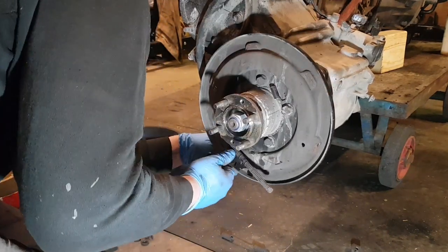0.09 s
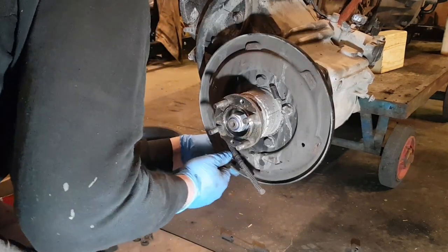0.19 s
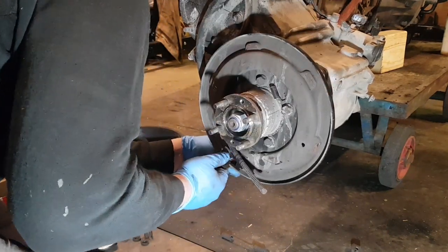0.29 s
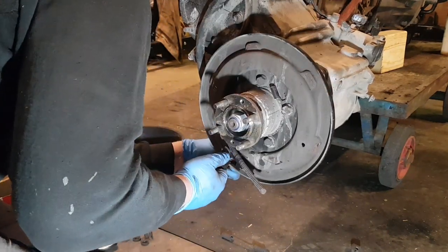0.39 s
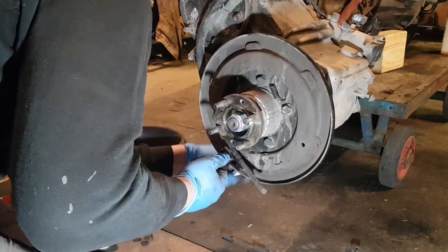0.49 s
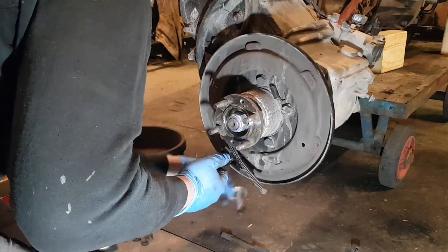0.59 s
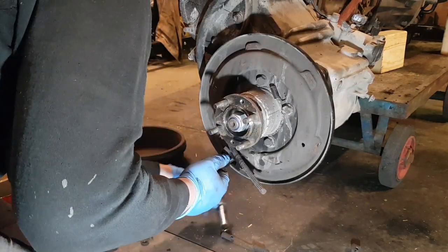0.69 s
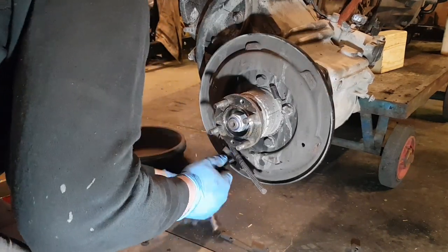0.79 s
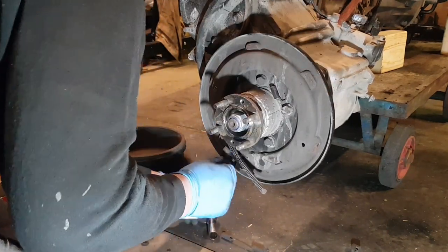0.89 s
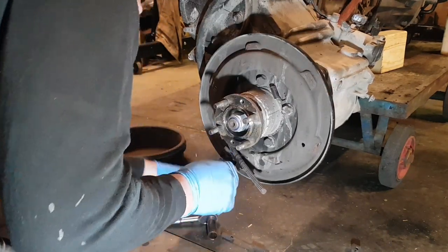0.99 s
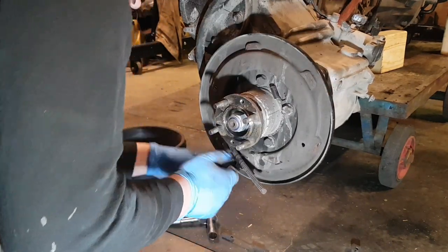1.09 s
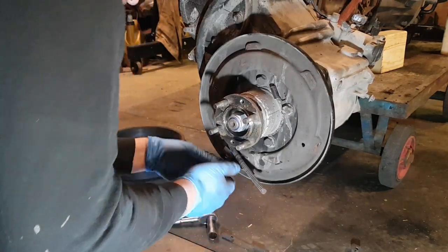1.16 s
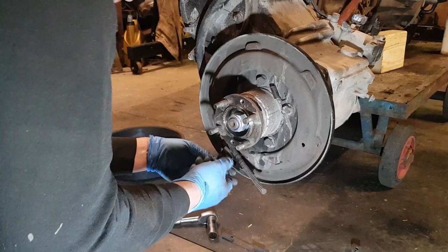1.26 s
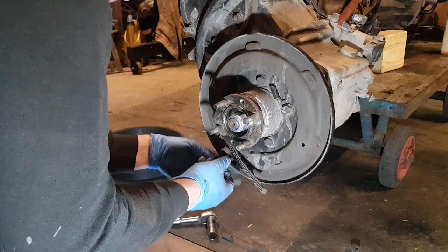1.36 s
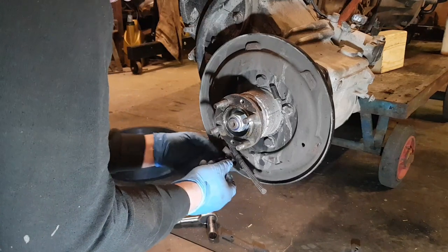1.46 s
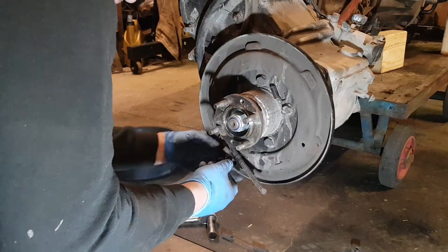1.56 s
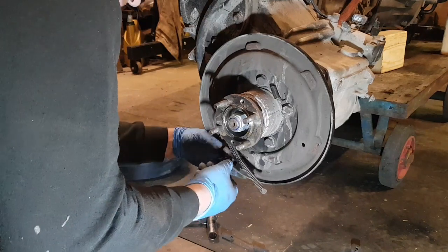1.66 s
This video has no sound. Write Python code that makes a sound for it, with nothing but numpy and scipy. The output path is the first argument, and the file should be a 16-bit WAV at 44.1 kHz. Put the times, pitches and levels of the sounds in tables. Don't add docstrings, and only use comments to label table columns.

```python
import sys
import numpy as np
from scipy import signal
from scipy.fft import rfft, irfft, next_fast_len
from scipy.io import wavfile

SR = 44100
rng = np.random.default_rng(int(sys.argv[2]) if len(sys.argv) > 2 else 0)


def volts_from_decibels(level):
    exponent = np.asarray(level, float) / 20
    return 10 ** exponent


def persist_wave(psi):
    counts = np.round(np.clip(psi, -1, 1) * 32767).astype(np.int16)
    wavfile.write(sys.argv[1], SR, np.atleast_2d(counts).T)


N = 74970

# pitch_hz, level_db, t60_s
PLATE_MODES = [(797, 5, 0.075), (778, -10.5, 0.16), (878, -14.5, 0.05), (936, -11.5, 0.05),
               (1010, -6.5, 0.056), (1079.5, -14, 0.11), (1175, -25, 0.052), (1480, -7.5, 0.09),
               (2470, -7.5, 0.064), (2616, -10, 0.064), (2880, -15, 0.015), (3256, -10, 0.023),
               (3440, -23, 0.07)]
PLATE_PAN_DB = -5


def rms_one(x):
    return x / np.sqrt(np.mean(x ** 2) + 1e-20)


def cut(x, hz, kind):
    return signal.sosfilt(signal.butter(2, min(hz, 20000), kind, fs=SR, output="sos"), x)


def pan(db):
    return volts_from_decibels(db * np.array([[.5], [-.5]]))


def at_hz(points, hz):
    points = np.array(points)
    return np.interp(np.log(hz), np.log(points[:, 0]), points[:, 1])


def in_time(rows):
    return np.interp(np.arange(N) / SR, *np.transpose(rows))


def drift(rate_hz):
    pole = np.exp(-80 * np.pi * rate_hz / SR)
    chance = rng.standard_normal(N // 40 + 2002)
    slow = signal.lfilter([1], [1, -2 * pole, pole * pole], chance)[2000:]
    return np.interp(np.arange(N) / 40, np.arange(len(slow)), rms_one(slow))


def dying(start_s, t60_s, rise_s):
    t = np.arange(N) / SR - start_s
    rise = np.clip(1 + t / rise_s, 0, 1) ** 2
    return np.where(t > 0, volts_from_decibels(-60 * np.abs(t) / t60_s), rise)


def blows(start_s, db, scatter_db):
    rattle_t60_s, rattle_db = 0.02, -29
    clicks = np.zeros(N)
    clicks[(np.array(start_s) * SR).astype(int)] = volts_from_decibels(db + scatter_db * rng.standard_normal(len(start_s)))
    after = signal.lfilter([0, 1], [1, -volts_from_decibels(-60 / (rattle_t60_s * SR))], clicks)
    return clicks + volts_from_decibels(rattle_db) * after * rng.standard_normal(N)


def body(modes, strikes, pan_db):
    spread_db, lag_s, skirt = 1.5, .00008, 1.45
    out = np.zeros((2, N))
    for (hz, db, t60_s), (lean, lag) in zip(modes, rng.standard_normal((len(modes), 2))):
        pole = volts_from_decibels(-60 / (max(t60_s, .003) * SR))
        feedback = [1, -2 * pole * np.cos(2 * np.pi * hz / SR), pole * pole]
        ring = volts_from_decibels(db) * signal.lfilter([.5, 0, -.5], feedback, strikes(hz) + 1e-18)
        ring = cut(cut(ring, hz * skirt, "low"), hz / skirt, "high")
        late = np.interp(np.arange(N) - abs(lag) * lag_s * SR, np.arange(N), ring)
        sides = np.array([ring, late] if lag > 0 else [late, ring])
        out += sides * pan(pan_db + spread_db * lean)
    return out


def banded(spectrum, shape, alike_plus):
    # pitch_hz, likeness (0 to 1)
    likeness = [(30, 1), (120, 0.94), (400, 0.59), (1000, 0.22), (4000, 0), (12000, 0.0)]
    low, high = spectrum[0][0], spectrum[-1][0]
    edges = np.geomspace(low, high, int(3 * np.log2(high / low)) + 2)
    white = rng.standard_normal((2, 2, N))
    out, power = 0, 0
    for k, (a, b) in enumerate(zip(edges, edges[1:])):
        band = signal.butter(2, [a, b], "band", fs=SR, output="sos")
        mid, side = signal.sosfilt(band, white[k % 2])
        hz = np.sqrt(a * b)
        alike = np.clip(at_hz(likeness, hz) + alike_plus, 0, 1)
        gain = volts_from_decibels(at_hz(spectrum, hz))
        power += gain ** 2 * np.mean(mid ** 2)
        stereo = np.sqrt(1 + alike) * mid + np.sqrt(1 - alike) * side * [[1], [-1]]
        out = out + gain * shape(hz) * stereo / np.sqrt(2)
    return out / np.sqrt(power)


def plate():
    # start_s, peak_db, brightness_db_per_octave
    knocks = [(0.021, -42, -34), (0.082, -37, -6.5), (0.146, -40.5, -9), (0.164, -39.5, -16),
              (0.177, -37.5, -7), (0.207, -35, 0), (0.212, -29.5, -12.5), (0.216, -30, -14.5),
              (0.221, -31, -6), (0.2275, -30, -18.5), (0.236, -37, -12), (0.261, -19.5, -4),
              (0.268, -25, -7.5), (0.272, -24, -1.5), (0.278, -17, 1), (0.2868, -10, -7.5),
              (0.303, -37, -3), (0.311, -29, -9), (0.324, -38, -12), (0.333, -41, -11), (0.364, -33.5, -20),
              (0.397, -39.5, -16), (0.417, -50.5, 3), (0.446, -49, -24), (1.272, -33.5, 8.5),
              (1.277, -41, 4.5), (1.306, -28.5, -3.5), (1.321, -26, -8.5), (1.375, -34.5, -22),
              (1.447, -41.5, -14), (1.453, -50.5, -11.5), (1.494, -56.5, 4)]
    # start_s,
    # pitch_hz, peak_db, t60_s
    bumps = [(0.21, 377.4, -46.5, 0.36), (.29, 356, -43, 0.11), (.29, 528, -43, 0.13),
             (0.288, 9500, -51, 0.028), (1.272, 446, -49.5, 0.24), (1.272, 6900, -49.5, 0.098),
             (1.276, 7180, -58, 0.05), (1.306, 432, -39.5, 0.11), (1.31, 3600, -64, 0.064),
             (1.376, 425, -45.5, 0.11), (1.503, 3700, -56.5, 0.065), (1.593, 1127, -68, 0.059),
             (0.977, 5440, -44, 0.043), (1.058, 4000, -54, .06), (1.098, 4030, -60, .05),
             (1.114, 4430, -51, 0.051), (.795, 5800, -60, .03)]
    # start_s, rms_db, t60_s
    sprays = [(0.259, -45, 0.11), (0.276, -37, 0.29), (0.444, -45.5, 0.36), (1.276, -44.5, 0.34),
              (1.308, -72, 0.35), (1.089, -57, 1), (1.495, -72, 0.25)]
    # pitch_hz, level_db (per Hz)
    spray_colour = [(500, -2), (1000, -4), (2000, 5), (2700, 8.5), (3600, 0), (5000, -6.5), (7000, -29),
                    (11000, -11.5)]

    start_s, peak_db, tilt_db = np.transpose(knocks)

    def strikes(hz):
        return blows(start_s, peak_db - 6.5 + tilt_db * np.log2(max(hz, 800) / 800), scatter_db=1.67)

    out = body(PLATE_MODES, strikes, PLATE_PAN_DB)
    for t, hz, level_db, t60_s in bumps:
        out += body([(hz, level_db, t60_s)], lambda _: blows([t], 0, 0), PLATE_PAN_DB)
    spray = sum(volts_from_decibels(level_db) * dying(t, t60_s, rise_s=0.0012) for t, level_db, t60_s in sprays)
    noise = banded(spray_colour, lambda hz: volts_from_decibels(1.3 * drift(50)), alike_plus=0.073)
    return out + spray * noise * pan(PLATE_PAN_DB)


def drag():
    # start_s, pressure_db, squeal_db
    pressure = np.array([(0, -63, -61.5), (0.077, -73, -69.5), (0.088, -52, -59.5), (0.202, -56.5, -49),
                         (0.221, -42, -45.5), (0.251, -58.5, -57.5), (0.284, -28.5, -42), (.33, -55.5, -74),
                         (.42, -68, -97.5), (.5, -91, -100.5)])
    # pitch_hz, level_db, t60_s
    jaw_modes = [(2850, -4, .015), (3270, -2, .015), (5850, -3, .015), (7060, -9, .02), (9660, -10, .02),
                 (14300, -2, .015)]
    slips_per_s, tilt_db, rasp_db = 2800, 0.5, -4.5

    sizes = volts_from_decibels(3.7 * np.minimum(rng.exponential(1, (3, N)), 5)) * rng.choice([-1, 1], (3, N))
    happens = rng.random((3, N)) < slips_per_s * volts_from_decibels(4 * drift(40)) / SR
    slips = rms_one(sizes * happens)
    shaken = body(PLATE_MODES, lambda hz: slips[0] * volts_from_decibels(tilt_db * np.log2(hz / 800)), PLATE_PAN_DB)
    rasp = slips[1:] + rng.standard_normal((2, N))
    rasp = cut(cut(rasp, 2545, "high"), 2545, "high")
    squeal = rms_one(body(jaw_modes, lambda hz: slips[0], PLATE_PAN_DB)) + volts_from_decibels(rasp_db) * rms_one(rasp)
    shaken_gain = volts_from_decibels(in_time(pressure[:, :2]) + 3)
    squeal_gain = volts_from_decibels(in_time(pressure[:, ::2]))
    return shaken_gain * rms_one(shaken) + squeal_gain * squeal


def spanner():
    # start_s, peak_db
    clicks = [
        (0.4436, -24.5),
    ]
    # pitch_hz, level_db, t60_s
    spanner_modes = [(1491, -11, 0.13), (1778, -12, 0.22), (2013, -22, .2), (2466, -6, 0.09),
                     (2520, -12, 0.25), (2645, -14, .12), (2810, -10, .1), (3042, -4, .06), (3079, 3, 0.15),
                     (3180, -2, 0.04), (3488, -6, 0.22), (3650, -6, 0.05), (4597, -10, 0.17),
                     (7070, -22, .15)]
    contact_hz = 4800
    start_s, peak_db = np.transpose(clicks)
    rings = body(spanner_modes, lambda hz: blows(start_s, peak_db - 5.5, scatter_db=1.5), pan_db=-3.5)
    return cut(rings, contact_hz, "low")


def dropped_part():
    # start_s, peak_db, ring_t60_s, jingle_db, crack_brightness_db_per_octave
    bounces = [
        (0.7678, -27.5, 1, -65.5, 5),
        (0.8603, -14, 0.36, -47.5, 2),
        (0.9767, -18.5, 0.28, -42, 2),
        (1.047, -30.5, 0.14, -58, 0),
    ]
    # pitch_hz, level_db (per Hz)
    colours = [
        [(200, -26), (330, -6.5), (1200, -2), (2200, -13), (3500, -28), (6200, -20.5), (7000, -72.5),
         (9000, -41.5)],
        [(150, -11.5), (330, -18), (640, 0.5), (930, 4), (1300, -7), (2000, -11.5), (4000, -31), (9000, -52)],
        [(130, -4.5), (250, -4), (640, 0.5), (1100, -1), (1550, -1.5), (2500, -9), (5500, -23), (9000, -27.5)],
    ]
    # start_s, level_db (against the bounce before)
    rocking = [(0.793, 5), (0.818, -22), (0.8636, 6), (.8705, 4.5), (0.883, -7), (0.905, -7), (0.982, -2.5),
               (0.995, -15), (1.008, -13.5), (1.058, 0)]
    # pitch_hz, level_db, t60_s
    part_modes = [(249.4, 3.5, 0.17), (396, -11, 0.078), (534, 1, 0.14), (628, -4, 0.19), (700, -7, 0.053),
                  (927, -6.5, 0.14), (1090, -4, 0.1), (1575, 0, 0.13)]
    # pitch_hz, level_db (per Hz)
    jingle_colour = [(5000, -3.5), (6700, -9), (7400, -1.5), (9300, -10.5), (12000, -1.5), (13500, -2),
                     (15700, -13.5)]
    part_db, part_pan_db = -14.5, -3.5
    slap_db, slap_t60_s, clatter_db = 3, 0.0088, 3
    treble_shortens = 0.027
    rock_t60_s, jingle_t60_s, jingle_lead_s = 0.019, 0.176, 0.026

    start_s, peak_db, ring_t60_s, jingle_db, crack_db = np.transpose(bounces)

    def strikes(hz):
        return blows(start_s, peak_db + part_db + at_hz(colours[1], hz), scatter_db=3.5)

    out = body(part_modes, strikes, pan_db=0)
    for k, next_s in enumerate([*start_s[1:], N / SR]):
        rocks = sum(volts_from_decibels(db) * dying(t, rock_t60_s, rise_s=0.00095)
                    for t, db in rocking if start_s[k] < t < next_s)
        slap = dying(start_s[k], slap_t60_s, rise_s=0.00038)

        def shape(hz):
            t60_s = ring_t60_s[k] * (hz / 800) ** -treble_shortens
            ring = volts_from_decibels(clatter_db * drift(59)) * dying(start_s[k], t60_s, rise_s=0.0015)
            crack = volts_from_decibels(slap_db + crack_db[k] * np.log2(hz / 800)) * slap
            return ring + crack + rocks

        out += volts_from_decibels(peak_db[k] - 12.5) * banded(colours[min(k, 2)], shape, alike_plus=0.32)
    jingle = sum(volts_from_decibels(db) * dying(t + 0.0045, jingle_t60_s, jingle_lead_s)
                 for t, db in zip(start_s, jingle_db))
    out += jingle * banded(jingle_colour, lambda hz: volts_from_decibels(3.7 * drift(56.0)), alike_plus=0.0)
    return out * pan(part_pan_db)


def garage(x):
    t60_s, wall_cut_hz = 0.3, 4500
    size = next_fast_len(N + SR)
    w = 2 * np.pi * np.arange(size // 2 + 1) / size
    spectrum, out = rfft(x, size), np.zeros((2, N))
    wall = 1 / (1 + 1j * w * SR / (2 * np.pi * wall_cut_hz * 4))
    for k, lag in enumerate(rng.uniform(.011, .045, 16) * SR):
        loop = volts_from_decibels(-60 * lag / SR / t60_s) * wall * np.exp(-1j * w * int(lag))
        echoes = irfft(spectrum * loop / (1 - loop), size)[:N]
        out[k % 2] += echoes * (-1) ** (k // 2)
    return out


def background():
    # pitch_hz, level_db (per Hz)
    rumble_colour = [(22, -24), (40, -1), (60, 9), (100, 5), (141, -7.5), (200, -8.5), (280, -18),
                     (500, -26.5)]
    # start_s, level_db
    machine_load = [(0, 2), (.4, 1), (.65, -1), (.95, 2), (1.2, 1.5), (1.45, -1.5), (1.7, -4)]
    # pitch_hz, rms_db
    hum_tones = [(63, -61.5), (117, -61)]
    # pitch_hz, level_db (per Hz)
    hiss_colour = [(300, -8.5), (600, -14.5), (800, -15), (1200, -16), (1900, -25.5), (2600, -18),
                   (6500, -19), (15700, -19)]
    # start_s, level_db
    hiss_gain = [(0, -64.5), (.06, -69), (.17, -71.5), (.3, -63.5), (.4, -77), (.75, -75.5), (.95, -61.5),
                 (1.15, -68), (1.3, -64.5), (1.43, -72.5), (1.51, -61.5), (1.7, -68)]
    rumble_db, hiss_db = -51.5, 6

    t, load_db = np.arange(N) / SR, in_time(machine_load)
    together = drift(0.65)
    lumps = banded(rumble_colour, lambda hz: volts_from_decibels(2.3 * together + 0.77 * drift(12.0)), alike_plus=.0)
    rumble = volts_from_decibels(rumble_db + load_db) * lumps
    hum = sum(volts_from_decibels(db + 2.5 + load_db + 1.8 * drift(5.8)) * np.sin(2 * np.pi * hz * t)
              for hz, db in hum_tones)
    gain_db = in_time(hiss_gain)
    mean_db = gain_db.mean()

    def breathing(hz):
        depth = np.clip(hz / 7000, .3, 1)
        return volts_from_decibels(depth * (gain_db - mean_db) + mean_db + 0.27 * drift(4.1))

    return rumble + hum + volts_from_decibels(hiss_db) * banded(hiss_colour, breathing, alike_plus=0.034)


def scene():
    dead_hz, dead_width_hz = 1988, 380
    room_db = -16.5
    notch = signal.iirnotch(dead_hz, dead_hz / dead_width_hz, SR)
    metal = signal.lfilter(*notch, plate() + drag()) + spanner()
    part = dropped_part()
    echo = garage((metal + volts_from_decibels(5.0) * part).mean(axis=0))
    return metal + part + volts_from_decibels(room_db) * echo + background()


def roll_off(x):
    return signal.sosfilt(signal.butter(12, 15850, fs=SR, output="sos"), x)


def record(dry):
    mix = signal.sosfilt(signal.cheby2(12, 60, 16150, fs=SR, output="sos"), dry)
    return roll_off(mix)


dry = scene()
out = record(dry)
persist_wave(out)
```